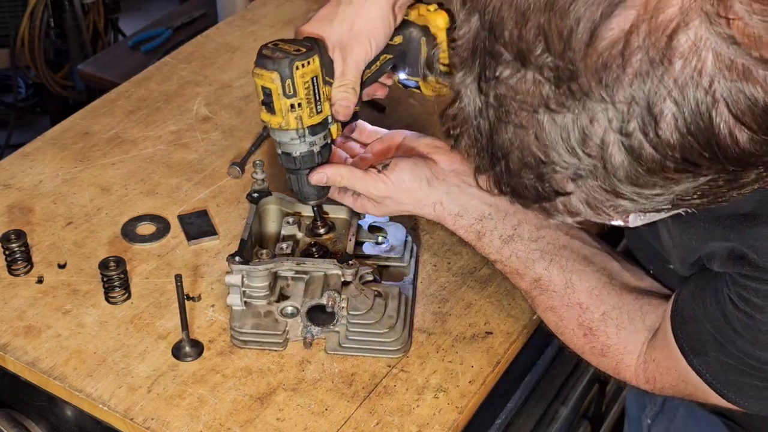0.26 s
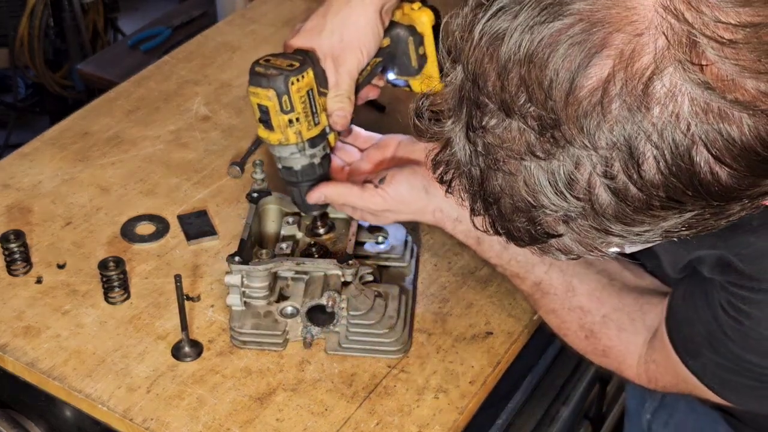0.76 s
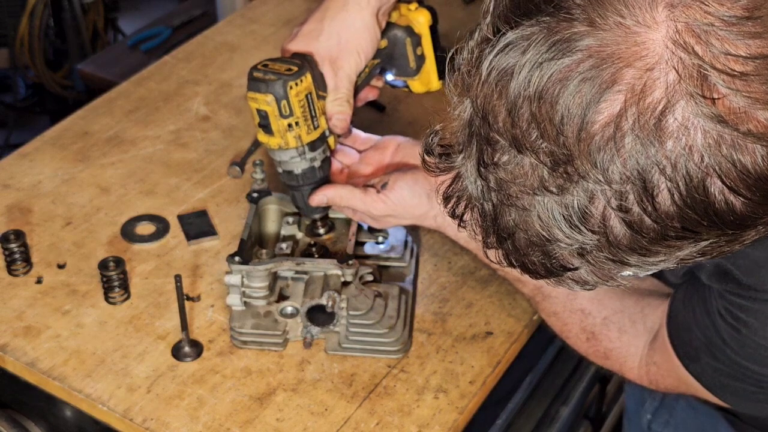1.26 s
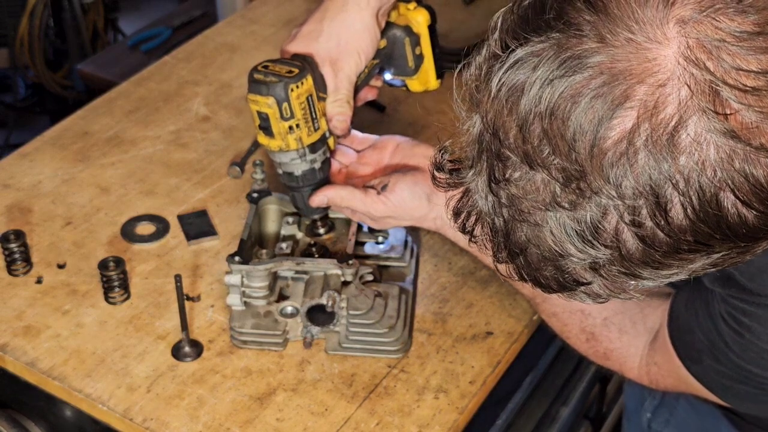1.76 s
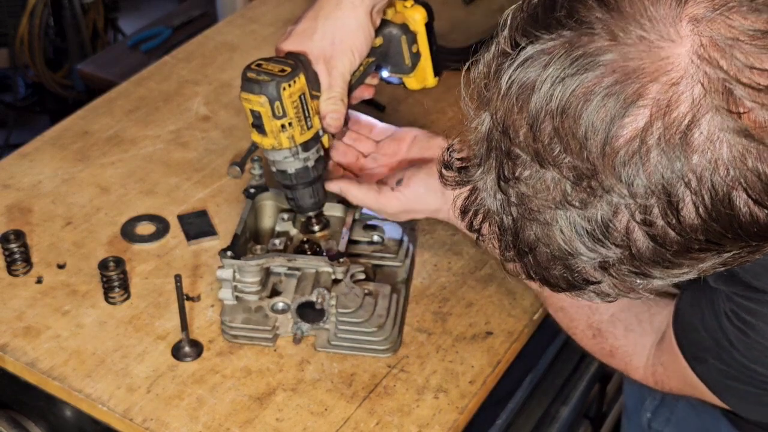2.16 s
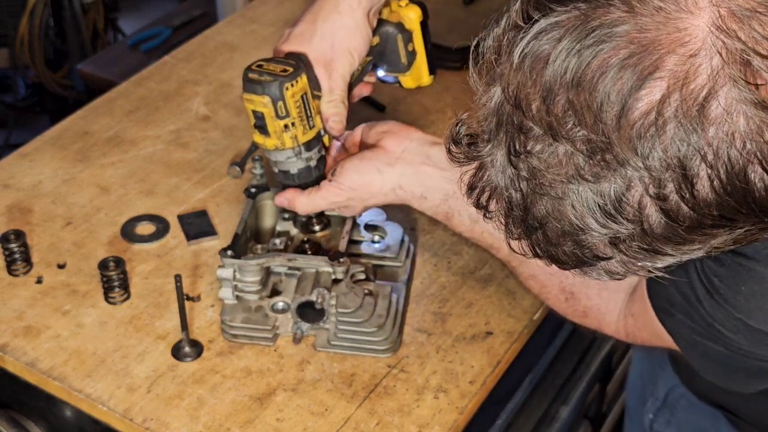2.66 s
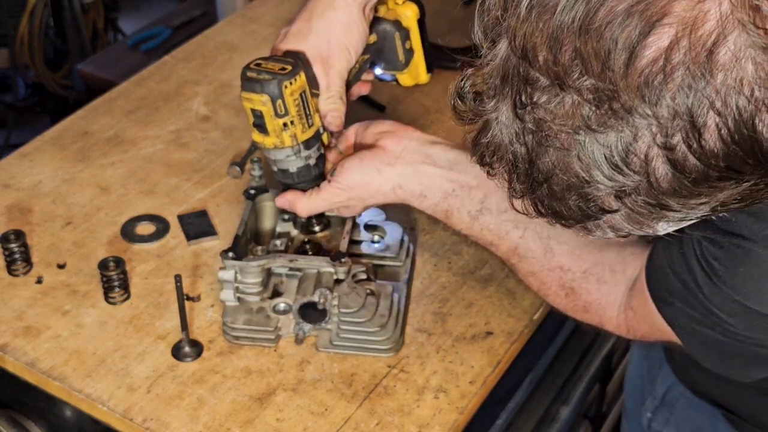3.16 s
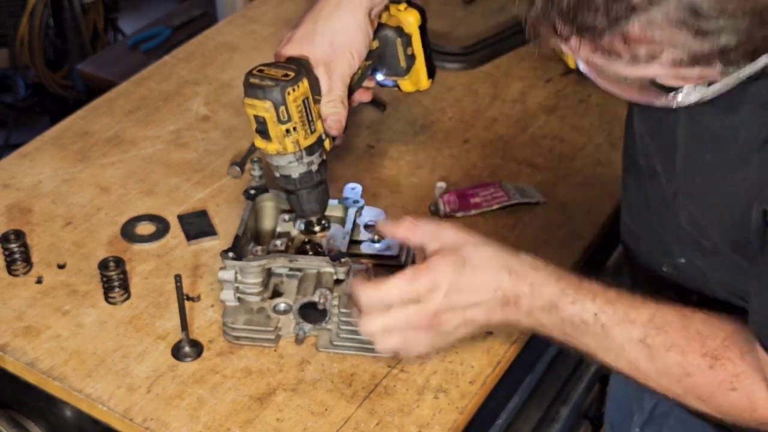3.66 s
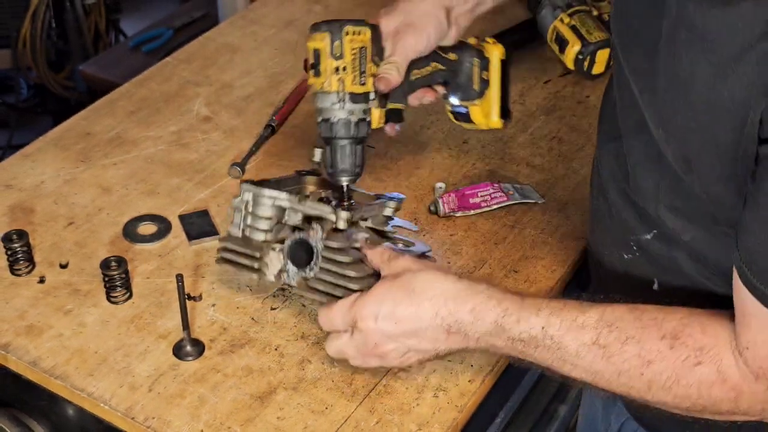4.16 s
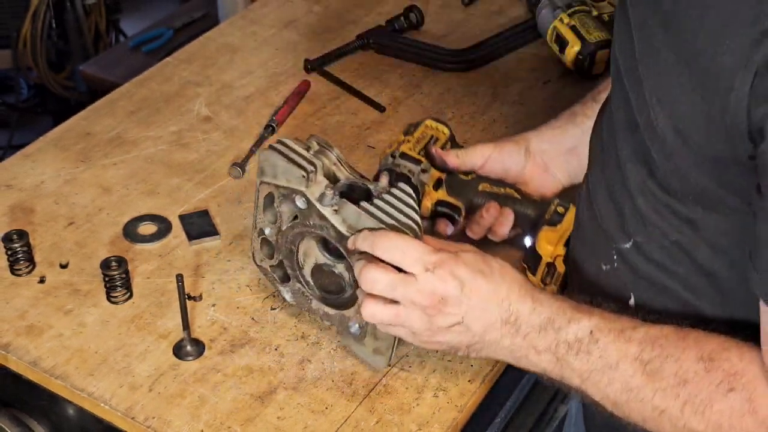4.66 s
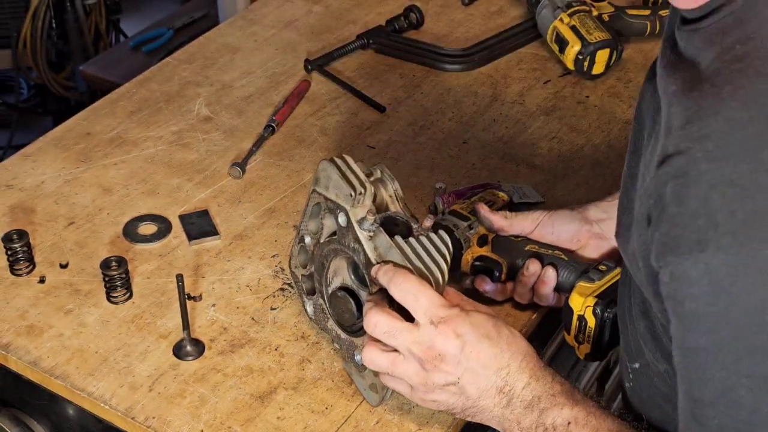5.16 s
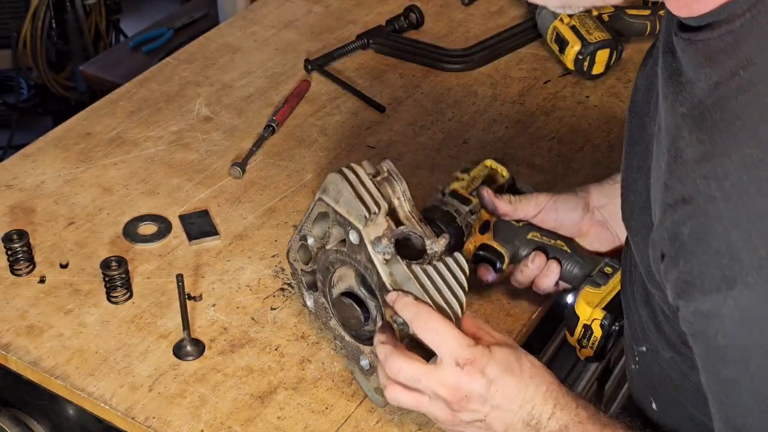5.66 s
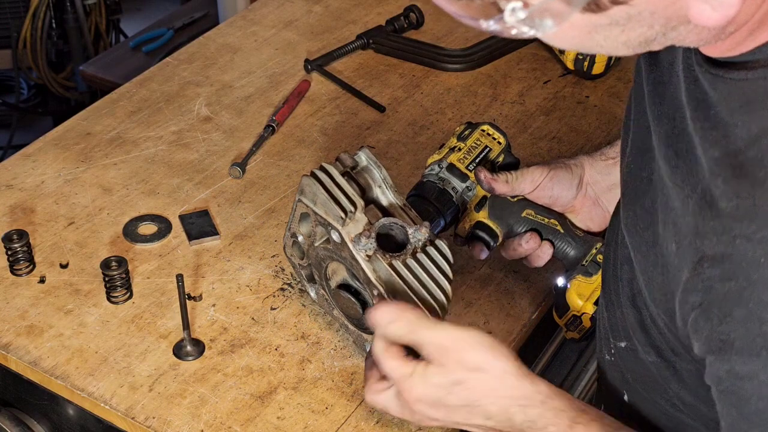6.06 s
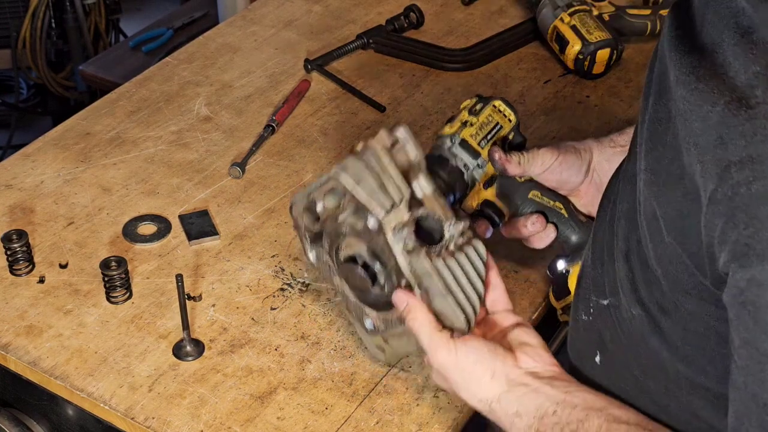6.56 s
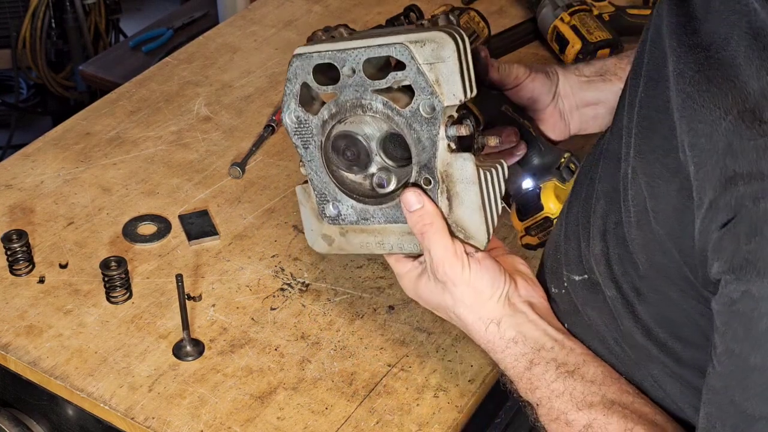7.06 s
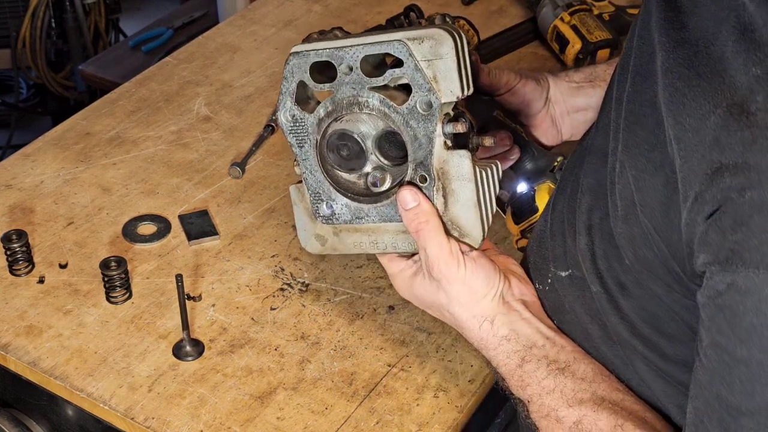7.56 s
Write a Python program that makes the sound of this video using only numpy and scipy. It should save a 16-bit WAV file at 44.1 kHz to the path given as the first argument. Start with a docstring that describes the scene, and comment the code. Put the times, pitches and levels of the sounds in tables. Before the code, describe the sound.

A small workshop with low rumble, swelling hum and faint air noise, heard close in stereo with a short room tail. From 0.3 to 0.75 s, light metallic ticks of a valve stem. At 0.95 s a cordless drill spins up quickly into a buzzing gear whine with bright hiss; around 1.9 s it sags, binds and judders, slowing to a stop by 2.35 s with small clicks. From 2.74 to 3.3 s the chuck rasps and snaps sharply. Dull bench knocks fall at 3.24 and 3.47 s. Around 3.9-4.6 s metal scrapes, tiny squeaks and bright clanks. A heavy wooden thud with tumbling after-knocks comes at 4.9 s, then a brief shove at 5.2 s. A soft metal scrape at 5.7 s, clinks at 6.3 and 6.6-6.7 s. From 6.93 s to the end, gritty pulsing lapping grinds while metal sings at high pitch, steadier after 7.22 s.

```python
"""In a small, humming workshop, a cordless drill whirs, sags under load and stops beside a wooden bench.
Its whir is gear tones plus noise from tiny tooth impacts; its chuck rasps and snaps in short noise bursts.
Blows set off the dying tones of the bench, and taps and scrapes those of a cylinder head and other metal.
Last, the drill turns a valve on its seat: lapping grit grinds as filtered impacts and the metal sings."""
import sys
import numpy as np
from scipy import signal
from scipy.fft import irfft, next_fast_len
from scipy.io import wavfile

SR = 44100
rng = np.random.default_rng(int(sys.argv[2]) if len(sys.argv) > 2 else 0)


def to_wav(s):
    """Save 16-bit WAV."""
    ch = np.atleast_2d(s).T  # columns
    pcm = np.round(np.clip(ch, -1, 1) * 32767)  # PCM
    wavfile.write(sys.argv[1], SR, pcm.astype(np.int16))


N = 343539
T = np.arange(N) / SR  # the time of every sample, in seconds


def amp(db):
    """Turns decibels into a gain."""
    return 10 ** (np.asarray(db) / 20)


def evened(x):
    """Scales a sound to an rms of one."""
    return x / np.sqrt(np.mean(x ** 2) + 1e-20)


def unit(x):
    """Scales a short sound to the energy of one millisecond at full level."""
    return x / np.linalg.norm(x) * np.sqrt(SR / 1000)


def read(points, hz):
    """Reads a curve of (Hz, value) points, spacing the pitches as logarithms."""
    f, value = np.transpose(points)
    return np.interp(np.log(hz + 1), np.log(f + 1), value)


def curve(rows):
    """Joins (seconds, value) points into a control with one value per sample."""
    return np.interp(T, *np.transpose(rows))


def stroke(start_s, rise_s, hold_s, t60_s):
    """A loudness shape that rises, holds and dies, falling 60 dB in each t60."""
    t = T - start_s
    fall = np.clip((t - rise_s - hold_s) / t60_s, 0, 3)
    return np.clip(t / rise_s, 0, 1) * amp(-60 * fall)


def add(mix, s, sound):
    """Mixes in a sound at a time in seconds."""
    part = mix[round(s * SR):][:len(sound)]
    part += sound[:len(part)]


def colour(x, points, size=4096):
    """Filters a sound to a given spectrum, with no echo ahead of the sound (minimum phase)."""
    log_gain = np.log(amp(read(points, abs(np.fft.fftfreq(size, 1 / SR)))))
    taps = np.fft.ifft(np.exp(np.conj(signal.hilbert(log_gain)))).real
    return signal.oaconvolve(x, taps[:size // 2])[:len(x)]


def hump(centre_hz, octaves):
    """The spectrum of a blow: strongest at its centre, falling to both sides and in the high treble."""
    hz = np.geomspace(20, 20000, 400)
    distance = np.log2(hz / centre_hz) / octaves
    db = -20 * np.log10(1 + distance ** 2 / 2) - 10 * np.log10(1 + (hz / 10500) ** 4)
    return np.transpose([hz, db])


def band(hz, width_hz):
    """A narrow band of noise, like a resonance kept ringing; at 0 Hz it is a slow random drift."""
    f = np.fft.rfftfreq(next_fast_len(N), 1 / SR)
    z = rng.standard_normal(len(f)) + 1j * rng.standard_normal(len(f))
    return evened(irfft(z / (1 + ((f - hz) / width_hz) ** 2))[:N])


def tone(hz, waver_hz, waver_rate_hz):
    """A sustained tone whose pitch wavers."""
    wavering_hz = hz + waver_hz * band(0, waver_rate_hz)
    return evened(np.sin(2 * np.pi * np.cumsum(wavering_hz) / SR))


def grains(per_s, spread_db):
    """Random tiny impacts of uneven size and either sign."""
    size = amp(spread_db * np.minimum(rng.exponential(1, N), 4))
    return size * rng.choice([-1., 1.], N) * (rng.random(N) < per_s / SR)


def burst(rise_s, size=4096):
    """The brief crunch of one contact: noise that swells, then dies."""
    u = T[:size] / rise_s
    return np.tanh(2 * rng.standard_normal(size)) * u * np.exp(-u)


def ring(modes, size=32768):
    """The sum of an object's dying tones; neighbours swing in opposite directions."""
    hz, db, t60 = np.transpose(modes)[:, :, None]
    sign = (-1) ** np.arange(len(modes))[:, None]
    tones = amp(db - 60 * T[:size] / t60) * np.sin(2 * np.pi * hz * T[:size])
    return (sign * tones).sum(0)


# How the valve stem, steel drive rod and finned head ring, listed under "stem", "rod" and "head".
# Each row: pitch in Hz, relative level in dB, time to fall 60 dB in seconds.
METAL_RINGS = {"stem": [(1230, -3, .25), (2750, -10.5, .9), (4334, -12, .35), (4490, -12.5, .4),
               (5050, -18, .3), (5249, -11, .2), (5389, 5, .11), (6460, -7, .4), (7009, -9, .3),
               (7450, -13, .4), (8963, -11, .3), (9421, -11, .3)], "rod": [(1190, -3, .1), (2735, -11, .35),
               (2912, -9, .4), (3499, -6, .2), (3935, -6, .3), (4560, -8, .2), (5394, -4, .35),
               (6370, 0, .2), (6471, -2, .25), (7386, -3, .3), (7920, -3, .2), (8134, -4, .25),
               (9539, -3, .25), (10510, -4, .25), (11530, -3, .2), (12590, -6, .2)],
               "head": [(2340, -5, .2), (2449, -6, .35), (2735, -13, .75), (3550, -4, .22),
               (3811, 1.5, .27), (3930, -8, .4), (4457, -5, .55), (4520, 2, .2), (4730, -8, .3),
               (5249, -7, .22), (5889, -13, .4), (6460, -2, .25), (7000, -6, .3), (7386, -8, .3),
               (8877, -6, .16), (10120, -1, .18), (11090, -4, .2)]}


def ringing(x, part):
    """A metal part's answer to a rubbing force, as loud as that force."""
    return np.std(x) * evened(signal.oaconvolve(x, ring(METAL_RINGS[part]))[:N])


# How long the room rings. Each row: frequency in Hz, time to fall 60 dB in seconds.
ROOM_DECAY = [(80, 0.64), (300, 0.42), (1000, 0.46), (4000, 0.45), (9000, 0.39), (16000, 0.3)]


def workshop(size=32768):
    """Dense reflections at two microphones, alike in the bass, each band dying at its own speed."""
    hz, t, z = signal.stft(rng.standard_normal((2, size)), SR, nperseg=256)
    same = 1 / (1 + (hz[:, None] / 800) ** 2)
    z[1] = same * z[0] + np.sqrt(1 - same ** 2) * z[1]
    dying = amp(-60 * t / read(ROOM_DECAY, hz)[:, None])
    tail = signal.istft(z * dying, SR, nperseg=256)[1][:, :size]
    tail *= np.clip((T[:size] - .003) / 0.00043, 0, 1)  # silent for the first 3 ms
    return tail / np.linalg.norm(tail[0])


def place(x, wet_db, left_db, count=3):
    """Sends a sound to the left, count samples later to the right, and into the room."""
    direct = np.array([x * amp(left_db / 2), np.roll(x, count) * amp(-left_db / 2)])
    room = signal.oaconvolve(x[None], workshop(), axes=1)[:, :N]
    return (direct + amp(wet_db) * room) / np.hypot(1, amp(wet_db))


# The rumble's spectrum. Each row: frequency in Hz, relative level in dB.
RUMBLE_COLOUR = [(20, -24.5), (32, -13.5), (48, 3.5), (65, -5.5), (90, -1.5), (115, -11.5), (160, -14),
                 (200, -14), (240, -10.5), (310, -32.5), (400, -31.5), (600, -30), (1000, -73)]
# The air noise's spectrum. Each row: frequency in Hz, relative level in dB.
AIR_COLOUR = [(350, -3), (520, -0.5), (1000, -4.5), (1500, -10.5), (2200, -20.5), (3200, -32), (5500, -38),
              (6000, -34.5), (6230, -24), (6600, -40), (10000, -43.5), (16000, -46)]
# Swells of the hum. Each row: start in seconds, hold in seconds, pitch in Hz, width in Hz, level in dB.
HUM_SWELLS = [(0, 0.29, 112.4, 10.5, -43.5), (0.404, 3.4, 82.7, 11, -48.5), (0.972, .3, 89.9, 3.3, -44.5),
              (3.061, 0.14, 119.6, 8.9, -41.5), (5.22, 0.497, 89.6, 8.5, -39.5)]
HUM_DB, SWELL_RISE_S, SWELL_T60_S = -55, .07, .4


def room_tone():
    """Low rumble, a swelling hum made of narrow noise bands, and faint air noise, partly shared."""
    rumble = amp(-45.5) * evened(colour(rng.standard_normal(N), RUMBLE_COLOUR))
    hum = amp(HUM_DB) * band(84.6, 8.5)
    for s, hold, hz, width, db in HUM_SWELLS:
        hum += amp(db) * band(hz, width) * stroke(s, SWELL_RISE_S, hold, SWELL_T60_S)
    shared, left, right = (evened(colour(noise, AIR_COLOUR)) for noise in rng.standard_normal((3, N)))
    air = amp(-61) * shared + amp(-56) * np.array([left, right])
    return place(rumble + hum, wet_db=-10.5, left_db=0.8) + air


# Taps on metal. Each row: start in seconds, part struck, level in dB before the shared lift,
# centre in Hz, spread in octaves, level of the ring in dB relative to the contact.
METAL_TAPS = [(.296, "stem", -61, 2980, 0.36, -6), (0.3759, "stem", -33.5, 1290, 0.14, -7),
              (0.4213, "stem", -42.5, 2660, 0.52, -10.5), (0.423, "stem", -38.5, 5200, 0.28, 1.5),
              (0.507, "stem", -50.5, 5800, .55, -5), (0.7443, "stem", -55.5, 3800, 0.63, -5),
              (3.384, "rod", -45, 1910, 0.31, 0.5), (4.127, "rod", -46, 4460, 0.48, 3),
              (4.2017, "rod", -33, 1080, 0.54, -4.5), (4.203, "rod", -30, 5070, 1.46, -5.5),
              (4.428, "rod", -50.5, 6000, 1.1, 5.5), (4.5, "head", -50, 4050, 1.1, 1),
              (4.611, "rod", -48, 4000, 0.47, -11), (5.232, "rod", -37.5, 1610, 0.51, -25),
              (5.991, "head", -58, 4350, 0.018, 18), (6.257, "head", -57, 9540, 0.67, 6),
              (6.288, "head", -51.5, 2370, 0.12, 2), (6.3182, "head", -38, 4800, 0.51, 4),
              (6.611, "head", -46, 9300, 0.27, -4), (6.716, "head", -46, 9500, 0.52, -1),
              (6.953, "stem", -33, 2170, 2.1, -6)]
TAP_LIFT_DB = 5.5


def taps():
    """Each tap is a crunch of contact plus the dying tones of the part, coloured by the blow."""
    out = np.zeros(N)
    for s, part, db, centre_hz, octaves, ring_db in METAL_TAPS:
        spectrum = hump(centre_hz, octaves)
        add(out, s, amp(db) * unit(colour(burst(.0015), spectrum)))
        add(out, s, amp(db + ring_db) * unit(colour(ring(METAL_RINGS[part]), spectrum)))
    return amp(TAP_LIFT_DB) * place(out, wet_db=-3, left_db=1)


# The trigger is pulled, eased off and let go.
PULL_S, EASE_S, STOP_S = 0.95, 2.03, 2.335
# The gear teeth meet at this top rate; the start falls short of it by a share and closes the gap.
TOP_HZ, START_SHORT, SPIN_UP_S = 704, .24, .1
SAG_HZ, SLOWING_HZ_PER_S = 146.4, 1100  # the sag at full load, and the slowing after easing off
# Drag on the spindle. Each row: time in seconds, load from 0 to 1.
SPINDLE_LOAD = [(1.7, 0.01), (1.91, 0.99), (2.01, .46)]


def mesh_rate():
    """The gears spin up, sag under load and slow as the trigger eases (Hz), but never below a tenth."""
    spun_up = TOP_HZ * (1 - START_SHORT * np.exp(-np.maximum(T - PULL_S, 0) / SPIN_UP_S))
    slowing = SLOWING_HZ_PER_S * np.maximum(T - EASE_S, 0)
    return np.maximum(spun_up - SAG_HZ * curve(SPINDLE_LOAD) - slowing, TOP_HZ / 10)


# The gear tones. Each row: multiple of the mesh rate, relative level in dB.
WHINE_TONES = [(.957, -7.5), (2, -4.5), (2.87, -2), (3, 1), (4, 2.5), (4.78, -6.5), (5, 2), (5.74, -7),
               (6, 1.5), (7, -3.5), (8, -4.5), (10, -4), (13, -32)]
# How the gear case favours some tones. Each row: frequency in Hz, gain in dB.
HOUSING_COLOUR = [(560, -19), (630, -10), (668, 10.5), (800, -13), (1120, 7.5), (1250, -4), (1390, 7),
                  (1650, -2), (1950, 4), (2100, -3.5), (2300, 2.5), (2750, -1.5), (3130, 11), (3450, 2.5),
                  (3750, 8), (4200, 6.5), (5000, 2), (9000, -12)]
WHINE_DB = -49  # before the gear case colours it
CASE_HZ, CASE_WIDTH_HZ, CASE_DB = 1378.5, 7.7, -55  # the gear case hums on one resonance


def gear_whine(turns):
    """Wavering multiples of the mesh rate through the gear case, which adds a hum of its own."""
    whine = np.zeros(N)
    for multiple, db in WHINE_TONES:
        wave = np.sin(2 * np.pi * (multiple * turns + rng.random()))
        whine += amp(db) * wave * (1 + .5 * band(0, 20))
    whine = evened(whine)
    whine *= 1 + 0.28 * np.sin(2 * np.pi * turns / 6)  # planet gears passing add sidebands
    whine = colour(whine, HOUSING_COLOUR) * amp(WHINE_DB + 1.2 * curve(SPINDLE_LOAD))
    whine += amp(CASE_DB) * band(CASE_HZ, CASE_WIDTH_HZ)
    return whine * stroke(PULL_S, 0.14, EASE_S - PULL_S - .1, .35)


# The bright tooth noise. Each row: frequency in Hz, relative level in dB.
HISS_COLOUR = [(2500, -41.5), (4300, 3), (5400, -0.5), (6700, -5), (8000, -4.5), (8900, 2), (10000, -2.5),
               (11000, -9.5), (13000, -12), (16000, -10)]
# The lower tooth noise. Each row: frequency in Hz, relative level in dB.
CHATTER_COLOUR = [(200, -47), (480, 2), (900, -13.5), (1300, 4.5), (1700, 1), (2300, 3), (3100, 4),
                  (4200, -1.5), (5200, -5.5), (7000, -53.5)]
# The spindle binds. Each row: start in seconds, hold in seconds, grinding level in dB, judder level in dB.
SPINDLE_BINDS = [(1.916, .025, -44.5, -42), (1.975, 0.032, -44, -40.5), (2.028, 0.03, -43, -54.5),
                 (2.079, 0.018, -44, -41.5), (2.275, 0.019, -45.5, -58.5)]
HISS_DB, CHATTER_DB = -43.5, -46.5  # at the top speed
HISS_DB_PER_OCTAVE, CHATTER_DB_PER_OCTAVE = 9, 4  # how loudness follows speed
BIND_RISE_S, BIND_T60_S = 0.01394, 0.058
BIND_HISS_DB = 0.5  # the hiss of a bind, relative to its grinding level


def tooth_noise(hz, turns):
    """Throbbing showers of tooth impacts follow the speed; where the spindle binds they grind and judder."""
    octaves = np.log2(hz / TOP_HZ)
    running = stroke(PULL_S, 0.054, STOP_S - PULL_S - .03, .06)
    grinding, shaking = np.zeros(N), np.zeros(N)
    for s, hold, grind_db, judder_db in SPINDLE_BINDS:
        bind = stroke(s, BIND_RISE_S, hold, BIND_T60_S)
        grinding += amp(grind_db) * bind
        shaking += amp(judder_db) * bind
    throb = 1 + 0.038 * np.sin(2 * np.pi * turns / 3) + 0.27 * band(0, 50)
    hiss_level = running * amp(HISS_DB + HISS_DB_PER_OCTAVE * octaves)
    hiss = evened(colour(grains(9000, 5.8) * throb, HISS_COLOUR))
    hiss *= np.hypot(hiss_level, amp(BIND_HISS_DB) * grinding)
    chatter_level = running * amp(CHATTER_DB + CHATTER_DB_PER_OCTAVE * octaves)
    chatter = evened(colour(grains(5000, 4.2) * throb, CHATTER_COLOUR))
    chatter *= np.hypot(chatter_level, grinding)
    judder_colour = [(60, -6.5), (130, 2), (250, -5), (480, -4.5), (900, -16), (1250, -2.5), (2000, -27.5)]
    judder = evened(colour(grains(600, 5.6), judder_colour)) * shaking
    return hiss + chatter + judder


def drill():
    """Gear whine and tooth noise share one slightly unsteady rotation."""
    hz = mesh_rate()
    turns = np.cumsum(hz * (1 + 0.00812 * band(0, 39.3))) / SR  # counted in tooth meetings
    whine = place(gear_whine(turns), wet_db=-7.0, left_db=4.5)
    return whine + place(tooth_noise(hz, turns), wet_db=2.5, left_db=6.0, count=4)


# Snaps of the chuck and trigger, and, before 2.4 s, catches of the gears as the drill slows. # Each row: start
# in seconds, level in dB before the shared lift, treble in dB relative to the body.
SNAPS = [(2.7772, -19.5, 1), (2.782, -21.5, -19.5), (2.842, -27, 13), (3.0459, -32, -4.5),
         (3.0854, -27.5, 11), (3.091, -32, 1.5), (3.1007, -37.5, 1), (2.304, -41.5, -2),
         (2.321, -37.5, -6), (2.336, -42.5, -8), (2.18, -47.5, -8), (2.216, -43, -9),
         (2.652, -61.5, -19), (2.7455, -47, -12.5)]
# The body of a snap. Each row: frequency in Hz, relative level in dB.
SNAP_BODY_COLOUR = [(200, -4.5), (800, -11), (1500, 0.5), (2600, 0), (4200, 0.5), (5500, -9), (8000, -6),
                    (16000, -18.5)]
# The treble of a snap. Each row: frequency in Hz, relative level in dB.
SNAP_TOP_COLOUR = [(3000, -39.5), (7200, -13.5), (8500, -5), (9900, 5), (10700, -4.5), (11500, 5),
                   (13500, -4), (16000, 6.5)]
# Twists of the chuck sleeve. Each row: start in seconds, hold in seconds, level in dB.
SLEEVE_TWISTS = [(2.741, 0.029, -44.5), (2.764, 0.028, -36), (2.845, 0.046, -38.5), (3.039, 0.013, -36.5),
                 (3.061, 0.006, -32), (3.079, 0.11, -31), (3.23, 0.11, -48.5)]
# The sleeve's rasp. Each row: frequency in Hz, relative level in dB.
RASP_COLOUR = [(60, -44), (120, 19.5), (300, 4.5), (800, -1.5), (1400, 3.5), (2300, 0.5), (3200, 2.5),
               (4300, 1), (5200, -3.5), (7000, -6), (8100, -1), (9000, -5), (12000, -12.5), (16000, -13.5)]
SNAP_LIFT_DB = 6.5
TWIST_RISE_S, TWIST_T60_S = 0.0019, 0.19
TWIST_RING_DB = -13  # the rod's ring, relative to the rasp


def chuck():
    """The sleeve rasps round and sets the drive rod ringing; snaps are short bursts in two bands."""
    snaps, twisting = np.zeros(N), np.zeros(N)
    for s, db, treble_db in SNAPS:
        body = unit(colour(burst(0.00048), SNAP_BODY_COLOUR))
        top = unit(colour(burst(0.00068), SNAP_TOP_COLOUR))
        add(snaps, s, amp(db) * (body + amp(treble_db) * top))
    for s, hold, db in SLEEVE_TWISTS:
        twisting += amp(db) * stroke(s, TWIST_RISE_S, hold, TWIST_T60_S)
    rasp = evened(colour(grains(3000, 3.9) * amp(3.2 * band(0, 90)), RASP_COLOUR)) * twisting
    rasp += amp(TWIST_RING_DB) * ringing(rasp, "rod")
    snaps = place(amp(SNAP_LIFT_DB) * snaps, wet_db=-4.5, left_db=6.5, count=4)
    return snaps + place(rasp, wet_db=-1, left_db=2.0, count=4)


# Blows on the bench. Each row: start in seconds, base level in dB, centre in Hz, spread in octaves,
# level of the crack in dB relative to the base.
BENCH_BLOWS = [(3.2375, -20, 377, 1.34, -17), (3.253, -34, 192, 1.1, -26),
               (3.4691, -18.5, 366, 1.28, -10.5), (3.482, -19, 111, 0.56, -15),
               (4.9021, -7.5, 397, 0.53, -10.5), (4.926, -20.5, 326, 0.33, -7.5),
               (4.944, -12.5, 96, 0.37, -23), (4.96, -36, 347, 0.4, 2), (5.007, -16.5, 93, 0.89, -29),
               (5.038, -28, 196, 0.79, -11.5)]
# How the wooden top rings. Each row: pitch in Hz, relative level in dB, time to fall 60 dB in seconds.
BENCH_RING = [(55.94, -3.5, 1), (79.7, 4.5, 0.097), (145.8, 3.5, 0.14), (230.4, -4, 0.26),
              (278.5, 3, 0.034), (363, 0, 0.078), (457, 8.5, 0.016), (501, 0.5, 0.034), (546, -15, 0.079),
              (680, -2.5, 0.028), (797, -7.5, 0.07), (1090, -13, 0.052)]
# The crack of contact. Each row: frequency in Hz, relative level in dB.
CRACK_COLOUR = [(300, -1), (1200, 0.5), (2000, -8), (3000, -9), (4500, -16), (7000, -22), (11000, -22.5),
                (16000, -28)]
WOOD_LIFT_DB = 7  # the ring of the wood, above the base level


def bench():
    """Each blow rings the wooden top around its own centre pitch, with a crack of contact."""
    out, wood = np.zeros(N), ring(BENCH_RING)
    for s, db, centre_hz, octaves, crack_db in BENCH_BLOWS:
        add(out, s, amp(db + WOOD_LIFT_DB) * unit(colour(wood, hump(centre_hz, octaves))))
        add(out, s, amp(db + crack_db) * unit(colour(burst(0.0029), CRACK_COLOUR)))
    return place(out, wet_db=-2.0, left_db=1.5, count=2)


# Metal sliding on metal. Each row: start in seconds, part rubbed, rise in seconds,
# time to fall 60 dB in seconds, level in dB, treble gain in dB.
METAL_SLIDES = [(3.93, "rod", 0.11, 1, -47, 5.5), (4.15, "rod", 0.049, 0.32, -42, 7.5),
                (4.42, "rod", 0.013, 0.15, -36.5, 5), (5.663, "head", 0.11, 1.13, -41, -4.5),
                (5.94, "head", .03, .7, -56.5, 8), (6.19, "head", .02, .25, -58, 5),
                (6.25, "head", 0.034, .2, -47, 6.5), (6.69, "head", 0.022, .2, -51.5, 7)]
# The sound of the rubbing. Each row: frequency in Hz, relative level in dB.
RUB_COLOUR = [(1200, -1.5), (2400, -9), (3100, -3.5), (3600, 2), (4600, 1), (5800, 0), (6800, -7.5),
              (9500, -14), (16000, -27)]
SLIDE_RING_DB = -5  # the part's ring, relative to the rub


def scrape(part):
    """Sliding contact, rough and uneven, keeps a metal part ringing."""
    rub = evened(colour(grains(3500, 3.2) * amp(2.5 * band(0, 25)), RUB_COLOUR))
    rub = evened(rub + amp(SLIDE_RING_DB) * ringing(rub, part))
    top = colour(rub, [(3500, -32.5), (8000, -5.0)])
    low = colour(rub, [(4500, -7.5), (9000, -22.0)])
    out = np.zeros(N)
    for s, rubbed, rise, t60, db, treble_db in METAL_SLIDES:
        if rubbed == part:
            out += amp(db) * stroke(s, rise, 0, t60) * (low + amp(treble_db) * top)
    return out


def scrapes():
    """The drive rod and the head are scraped as they are handled."""
    return place(scrape("rod") + scrape("head"), wet_db=0.5, left_db=5.5, count=2)


# The stem squeaks in its guide.
# Each row: start in seconds, length in seconds, pitch in Hz, glide in Hz per second, level in dB.
STEM_SQUEAKS = [(3.948, 0.096, 2345, 699, -63), (4.014, 0.022, 2360, -2500, -51.5),
                (4.036, 0.082, 3990, 3297, -59.5)]


def squeaks():
    """Stick and slip makes short, unsteady, gliding tones."""
    out = np.zeros(N)
    for s, length, hz, glide, db in STEM_SQUEAKS:
        arch = np.sin(np.pi * np.clip((T - s) / length, 0, 1))
        out += amp(db) * arch * tone(hz + glide * (T - s), 0.013 * hz, 81)
    return place(out, wet_db=-5, left_db=1)


# Shoves over the bench top.
# Each row: start in seconds, rise in seconds, time to fall 60 dB in seconds, level in dB.
BENCH_SHOVES = [(5.13, 0.058, 0.55, -58), (5.215, 0.019, 0.047, -37), (5.26, 0.054, 0.1, -51)]
# The sound of sliding on wood. Each row: frequency in Hz, relative level in dB.
WOOD_RUB_COLOUR = [(300, 4), (1000, 3.5), (2000, 2), (2800, -4.5), (3800, 0), (5500, -6.5), (7500, -5),
                   (10000, -9), (16000, -13)]


def shoves():
    """Parts shoved across the wood make a shower of tiny impacts."""
    rub = evened(colour(grains(4000, 2.8), WOOD_RUB_COLOUR))
    pushing = sum(amp(db) * stroke(s, rise, 0, t60) for s, rise, t60, db in BENCH_SHOVES)
    return place(rub * pushing, wet_db=0.5, left_db=5.5, count=2)


# The sound of crushed grit. Each row: frequency in Hz, relative level in dB.
GRIT_COLOUR = [(150, -18.5), (310, -21.5), (430, -8), (600, -9.5), (900, -3), (1100, -4), (1300, 9),
               (1700, -0.5), (2150, -6), (3000, -5.5), (3700, 5), (4150, 1), (5600, -7.5), (8300, -6),
               (11000, -12), (16000, -16)]
# The ring of valve and seat. Each row: pitch in Hz, width in Hz, relative level in dB on fresh paste,
# relative level in dB when bedded in.
VALVE_RING = [(1317, 8, -12, -8), (1690, 30, -10, -15), (2450, 8, -14, -9), (2667, 7, -9, -2.5),
              (3310, 18, -11, -9), (3508, 10, -11, -7), (3705, 9, -5, .5), (3930, 20, -11, -9),
              (4066, 10, -4.5, -4), (4135, 35, -2.5, -12), (4194, 7, 4, -5), (4790, 7, -6, -5),
              (5384, 25, -10, -11), (5880, 25, -15, -16), (6450, 25, -14, -15), (8030, 25, -14, -14)]
LAP_S, LAP_RISE_S, BED_S, BEDDING_S = 6.933, 0.057, 7.22, 0.035  # starts, rises, then beds in
LAP_DB, BEDDED_DB = -34.5, 1.15  # the grit's level, and its gain once bedded in
SONG_DB = -9  # the ring's further gain


def lapping():
    """Grit is crushed between valve and seat; the ring's balance shifts as the valve beds in."""
    bedded = np.clip((T - BED_S) / BEDDING_S, 0, 1)
    pressure = amp(LAP_DB + BEDDED_DB * bedded) * np.clip((T - LAP_S) / LAP_RISE_S, 0, 1)
    # the grit bites unevenly round each turn
    bite = amp(2.4 * band(0, 54) + 0.27 * band(0, 10) + 0.5 * np.sin(2 * np.pi * 24 * T))
    grit = evened(colour(grains(5000, 2.4) * bite, GRIT_COLOUR))
    song = np.zeros(N)
    for hz, width, fresh_db, bedded_db in VALVE_RING:
        note = tone(hz, 0.803 * width, width) + .6 * band(hz, width)
        song += note * amp(fresh_db + bedded * (bedded_db - fresh_db))
    song *= bite * np.clip((T - LAP_S) / 0.21, 0, 1)  # the ring takes a moment to build
    grinding = place(grit * pressure, wet_db=1.0, left_db=4.5, count=2)
    return grinding + place(amp(SONG_DB) * song * pressure, wet_db=-6.5, left_db=2.5, count=2)


def scene():
    """Everything on and around the bench."""
    handling = taps() + scrapes() + squeaks() + shoves()
    return room_tone() + handling + drill() + chuck() + bench() + lapping()


EDGE_HZ = 16000


def record(dry):
    """The recorder's band limit: a low-pass filter."""
    low_pass = signal.firwin(401, EDGE_HZ, window=("kaiser", 8), fs=SR)
    return signal.oaconvolve(dry, low_pass[None], "same")


dry = scene()
out = record(dry)
to_wav(out)
```